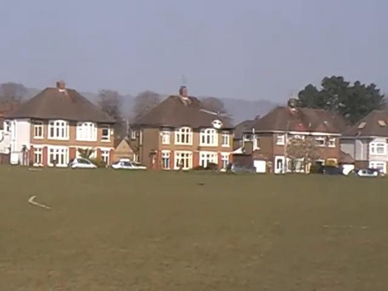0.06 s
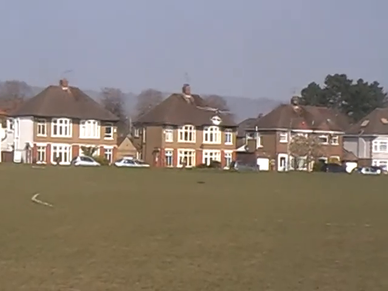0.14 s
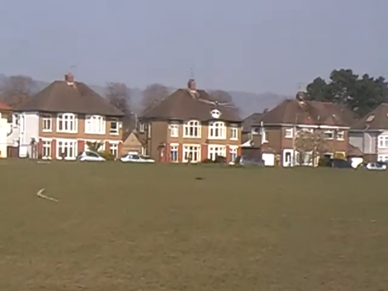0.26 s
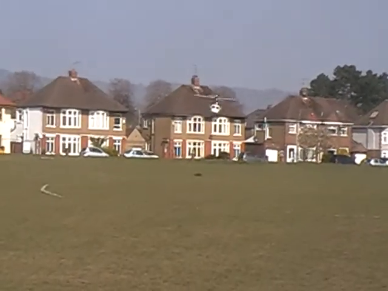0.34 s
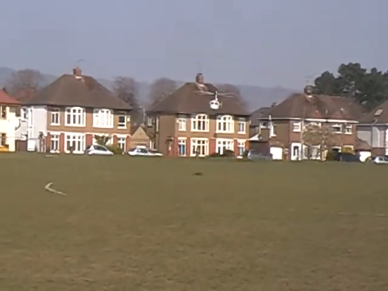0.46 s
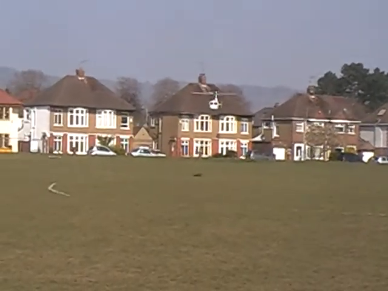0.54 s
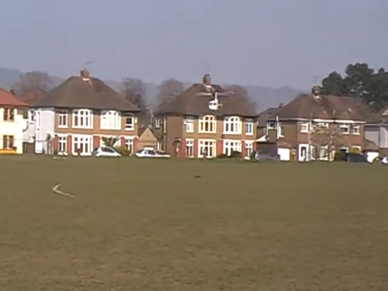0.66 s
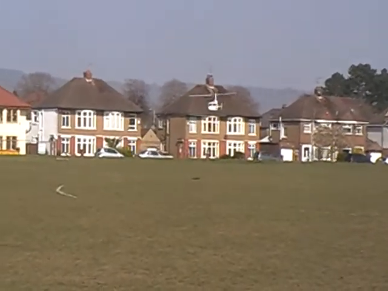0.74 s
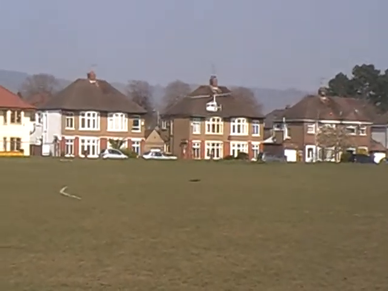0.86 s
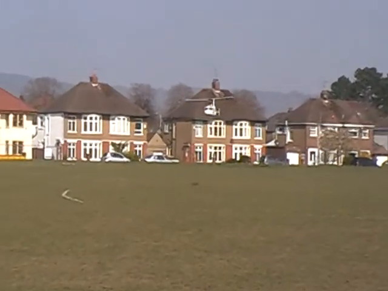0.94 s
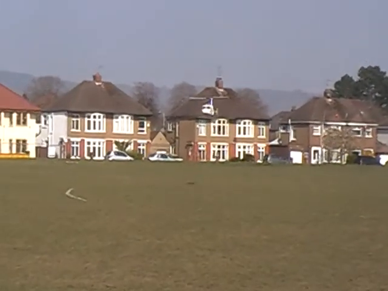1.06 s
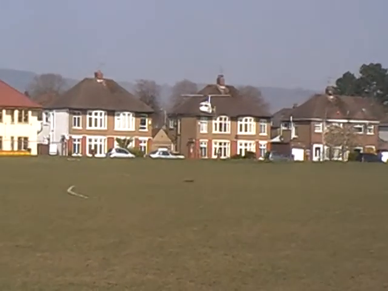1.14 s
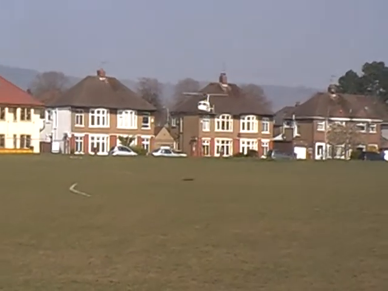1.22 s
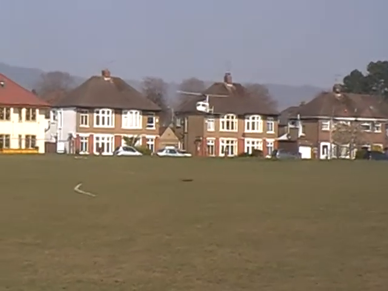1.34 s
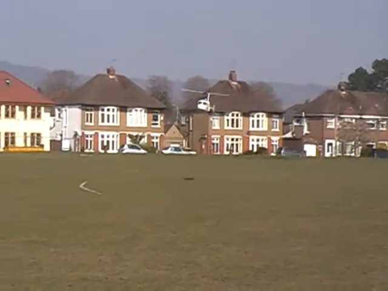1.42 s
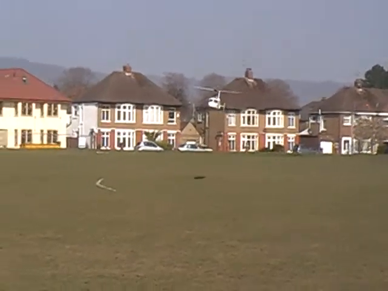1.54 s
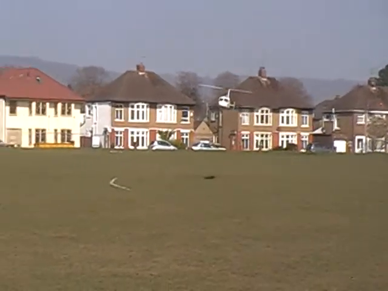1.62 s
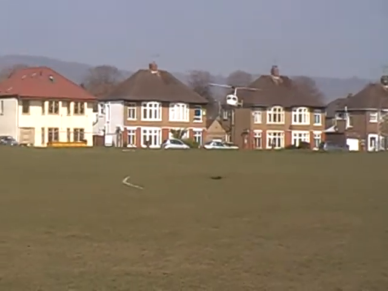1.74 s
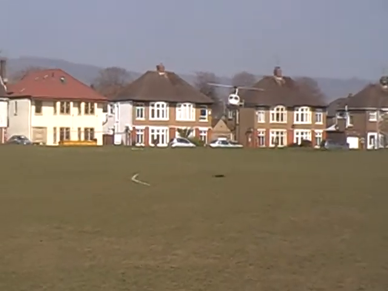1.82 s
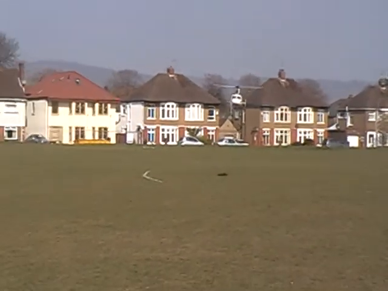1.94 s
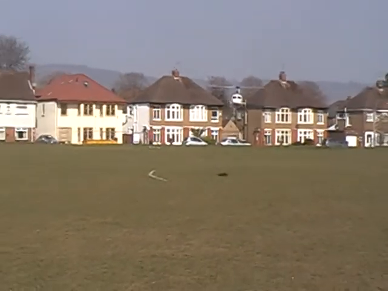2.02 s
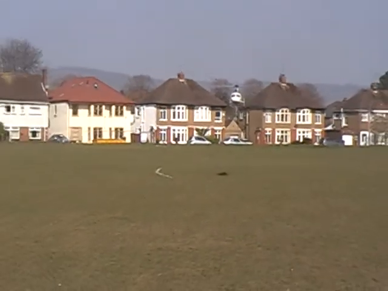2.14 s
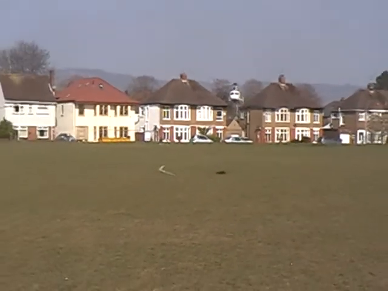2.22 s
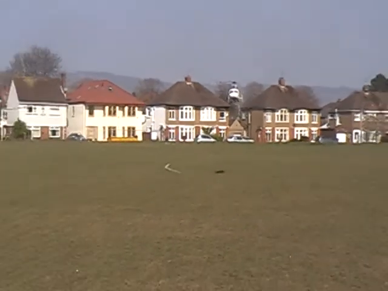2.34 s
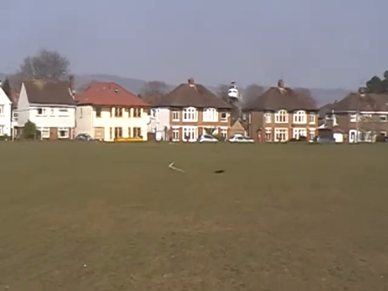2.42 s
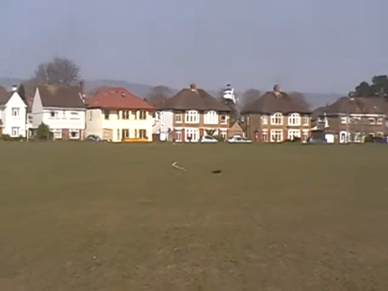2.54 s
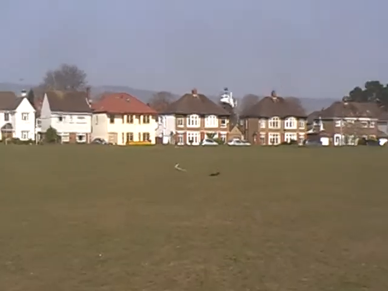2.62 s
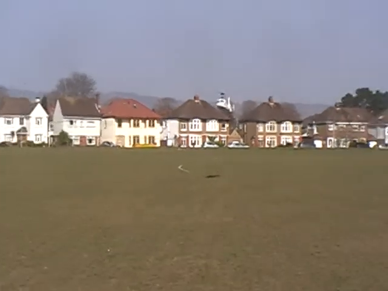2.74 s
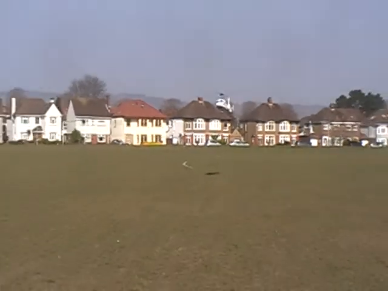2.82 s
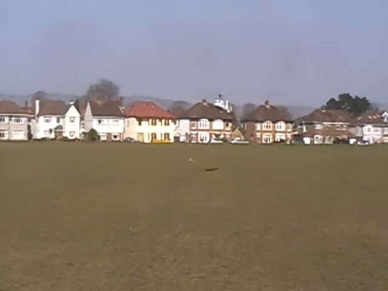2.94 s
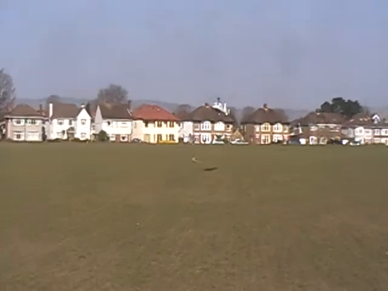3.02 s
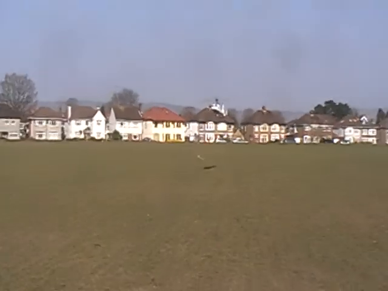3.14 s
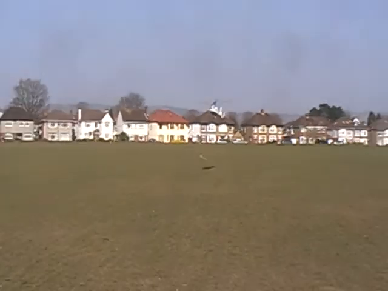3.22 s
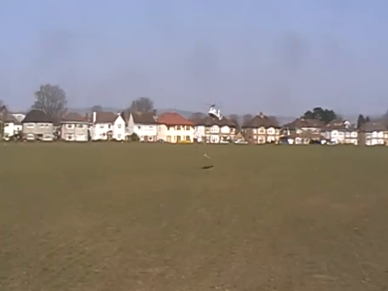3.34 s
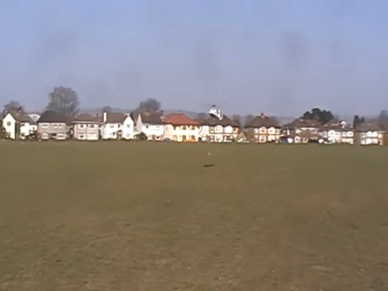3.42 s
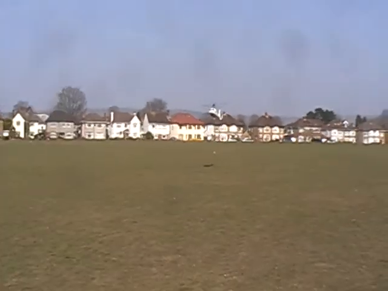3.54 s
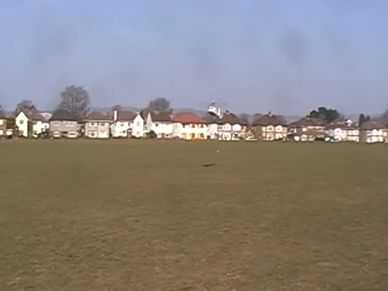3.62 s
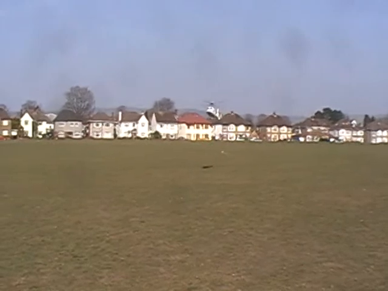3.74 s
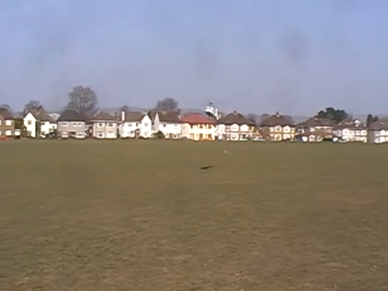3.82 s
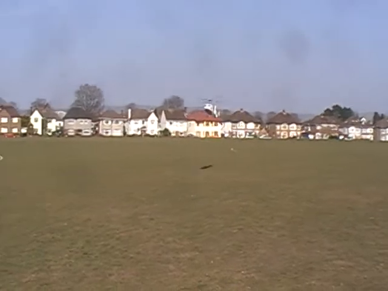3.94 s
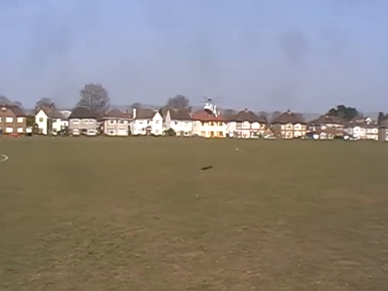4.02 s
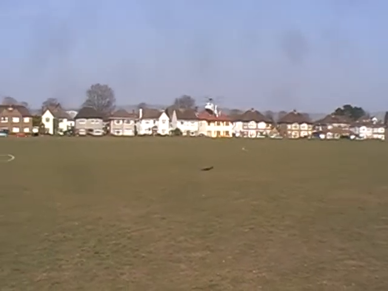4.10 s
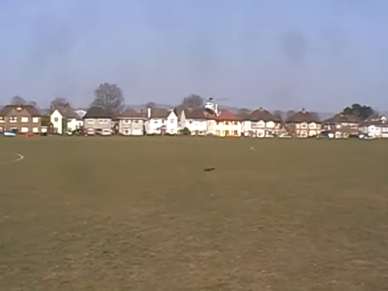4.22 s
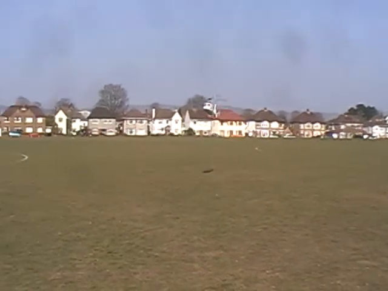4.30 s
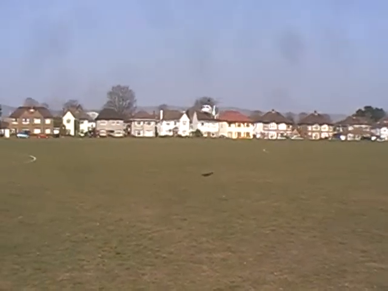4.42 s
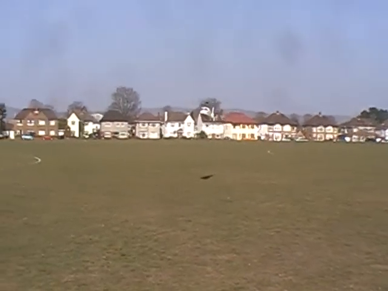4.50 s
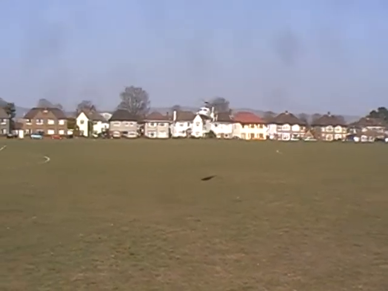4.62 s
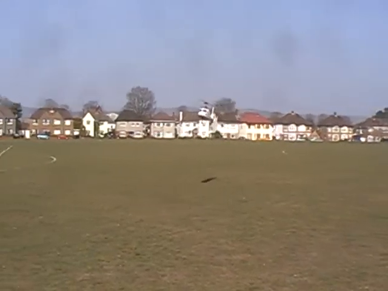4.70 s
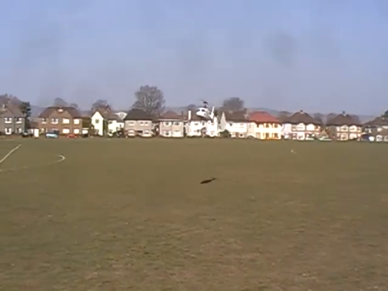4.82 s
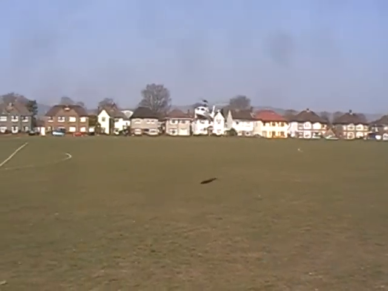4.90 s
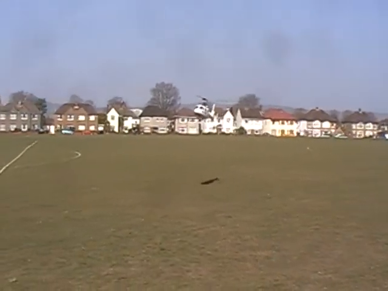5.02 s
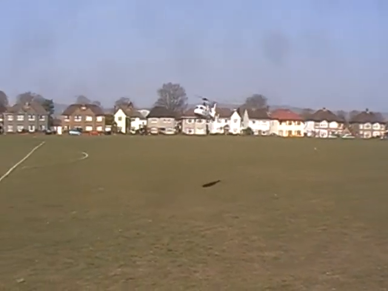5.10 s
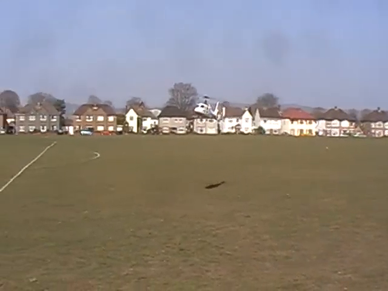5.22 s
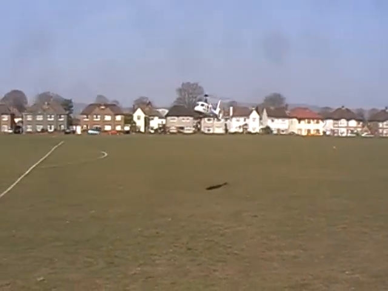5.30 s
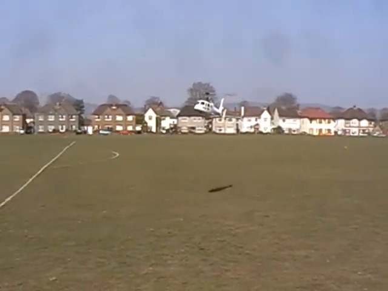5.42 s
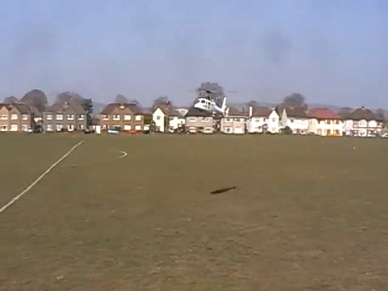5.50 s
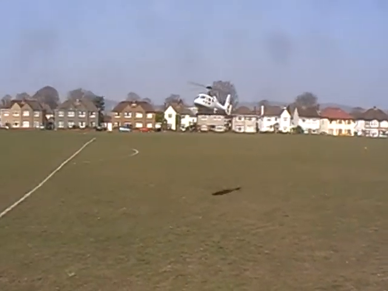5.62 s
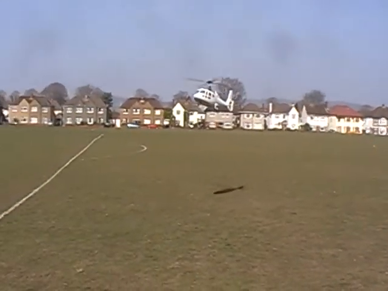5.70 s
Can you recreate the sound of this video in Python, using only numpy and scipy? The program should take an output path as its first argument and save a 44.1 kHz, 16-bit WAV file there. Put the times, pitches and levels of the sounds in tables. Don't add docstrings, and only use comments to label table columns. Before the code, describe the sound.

A petrol model helicopter flies over an open grass field, heard on a stereo camera microphone. From the start there is a raspy, buzzing drone near 160 Hz, rich in harmonics, with gear whines, rapid rotor flutter and hissing exhaust. It stays at moderate level while circling, with small wavers, brief ringing chirps around 0.5 to 2 seconds and dips near 1.05 and 1.85. A tiny knock clicks at about 0.5. From 2.2 the pitch sags, reaching its lowest near 3.7, around 143 Hz, as the tail turns this way; the low tone thins and the treble becomes hissy and crackly. A fuzzy high fan whine shows briefly at 3.3 and more strongly around 4.2. From 4 seconds pitch climbs and loudness swells steadily, the low tone pulsing slowly, loudest at the end, 5.76. Soft wind thumps touch the left side from 3.8 to 4.8, over very faint distant murmur.

```python
import sys
import numpy as np
from scipy import signal
from scipy.fft import rfft, irfft, next_fast_len
from scipy.io import wavfile
from scipy.ndimage import uniform_filter1d, map_coordinates

SR = 44100
rng = np.random.default_rng(int(sys.argv[2]) if len(sys.argv) > 2 else 0)


def volts_from_db(level):
    exponent = np.asarray(level, float) / 20
    return 10 ** exponent


def unload_audio(sound):
    columns = np.transpose(np.atleast_2d(sound))
    steps = np.round(np.clip(columns, -1, 1) * 32767)
    wavfile.write(sys.argv[1], SR, steps.astype(np.int16))


N = 254016
COARSE = np.arange(0, N + 64, 64)

# time_s, firing_hz, level_db
ENGINE = [(0, 162.8, -26), (.3, 162.7, -24), (.75, 162.3, -24), (1.05, 161.7, -24.5), (1.5, 161.7, -23.5),
          (1.9, 161.7, -25), (2.2, 160.5, -24.5), (2.45, 159.9, -25.5), (2.75, 154, -25), (3.2, 149.7, -24),
          (3.45, 146.5, -24), (3.7, 143.3, -23.5), (4.1, 145.1, -22), (4.5, 147, -20.5), (4.8, 149, -19),
          (5.05, 152.4, -17.5), (5.3, 153.4, -16.5), (5.76, 156, -15)]
# time_s, heading (0 side, 1 tail, 2 nose), grass_delay_ms, grass_strength (0-1), phase_turns
FLIGHT = [(0, 0, .36, .45, -.12), (.7, 0, .41, .47, -.1), (1.2, 0, .5, .48, -.13), (1.6, 0, .5, .54, -.08),
          (2.1, .15, .55, .82, -.09), (2.6, .65, .66, .8, -.075), (3.2, 1.04, .72, .87, .015),
          (3.6, 1.02, .78, .86, .075), (4, 1.12, .93, .62, .03), (4.5, 1.56, 1.07, .45, .03),
          (5.1, 1.83, 1.24, .54, -.01), (5.35, 1.85, 1.42, .4, 0), (5.5, 1.95, 1.6, .6, 0),
          (5.76, 2.04, 1.66, .5, 0)]


def helicopter():
    # frequency_hz, level_db
    grass_colour = [(200, -1), (600, -2), (1500, -4), (4000, -8), (9000, -18)]
    # frequency_hz, level_db
    hull_colour = [(1200, -30), (2500, -3), (9000, 0)]
    t = np.arange(N) / SR
    steady, rocked = shaft()
    heading, grass_ms, grass, turns = curves(FLIGHT)
    level = volts_from_db(curves(ENGINE)[1])

    tones = shaft_tones(steady, rocked, heading) + gear_tones(steady, heading)
    direct = level * (tones + chirps(steady, rocked) + volts_from_db(-3.0) * hiss(rocked, heading))

    off_grass = echo(direct, grass_colour, grass_ms, grass, turns)
    hull_ms = .015 + .105 * np.tanh(t / .45) + .012 * t
    hull_strength = .6 * np.exp(-(t / 1.5) ** 2)
    off_hull = echo(direct, hull_colour, hull_ms, hull_strength)

    strong = exhaust(rocked, heading, grass_ms, grass, turns)
    treble = level * (whistle(steady) + spits(steady, heading))
    return direct + off_grass + off_hull + strong + treble


def shaft():
    firing_hz = curves(ENGINE)[0]
    steady = 2 * np.pi * np.cumsum(firing_hz) / SR
    rocked = steady + 0.043 * np.sin(steady / 16) + 0.036 * wobble(25)
    return steady, rocked


def exhaust(rocked, heading, grass_ms, grass, turns):
    # order, side_db, tail_db, nose_db, lurch_share
    strong_orders = [(1, -20, -15.5, -27.5, 0.22), (2, -22.5, -13.5, -12, 0.96), (4, -14, -12.5, -14, 0.52),
                     (6, -18, -18.5, -13, 0.13)]
    # time_s, half_length_s, level_db
    lurches = [
        (0, .06, -14),
        (1.05, .1, -6),
        (1.84, .08, -8),
        (2.6, .08, -13),
    ]
    # time_s, half_length_s, level_db
    shadow = (3.7, 0.91, -13.5)
    shadow_s, shadow_half_s, shadow_peak_db = shadow
    lurch_db = sum(db * spell(s, half, sharp=2) for s, half, db in lurches)
    shadow_db = shadow_peak_db * spell(shadow_s, shadow_half_s)

    controls = np.array([*curves(ENGINE), heading, grass_ms, grass, turns, lurch_db, shadow_db])
    controls = controls[:, np.minimum(COARSE, N - 1)]
    hz, level_db, heading, grass_ms, grass, turns, lurch_db, shadow_db = controls

    beat_hz, beat_peak_s, beat_share = 2.25, 5.26, .8
    closing = np.clip(3 * (heading - 1.3), 0, 1)
    beat = 1 + beat_share * closing * np.exp(2j * np.pi * beat_hz * (COARSE / SR - beat_peak_s))

    out = 0
    for order, side, tail, nose, share in strong_orders:
        lag_turns = order * hz * grass_ms / 1000 + turns
        gain = np.abs(1 + np.clip(grass + .2, 0, .9) * np.exp(2j * np.pi * lag_turns))
        if order == 1:
            gain = gain * np.abs(beat) * volts_from_db(shadow_db)
        db = level_db + by_heading(heading, side, tail, nose) + share * lurch_db + 20 * np.log10(gain)
        out = out + tone(rocked, order, db, drift=0.089, flutter_db=0.0)
    return out


def shaft_tones(steady, rocked, heading):
    weak_orders = [.5, 1.5, 3, 5, 7, 8, 9, 10, 11, 12, 13, 14, 15, 16, 17, 18, 19, 21, 22, 23, 24, 25, 26,
                   33, 35, 37, 38, 41, 48, 49]
    # side_db, tail_db, nose_db
    weak_levels = [(-42, -38, -33.5), (-33.5, -34, -27), (-23, -21, -29), (-29.5, -19, -19.5),
                   (-30, -23, -25.5), (-23, -19.5, -31), (-19.5, -21.5, -15), (-30, -20, -24),
                   (-18.5, -14, -16), (-12, -16.5, -18), (-33, -22.5, -15), (-15.5, -17, -17),
                   (-41, -15, -20.5), (-25.5, -28, -36), (-18.5, -38, -21), (-24, -24, -27),
                   (-22, -25, -21.5), (-22, -30, -25), (-31, -35, -18), (-15, -30, -24), (-15.5, -32, -33),
                   (-34, -32, -18.5), (-45, -24, -30), (-17, -27, -21.5), (-31, -31, -22), (-27, -36, -32),
                   (-19, -53, -17), (-33, -37, -18), (-36, -49, -24), (-46, -52, -18)]
    turn = heading[np.minimum(COARSE, N - 1)]
    lines = sum(tone(rocked, order, by_heading(turn, *db), drift=.23, flutter_db=2.2)
                for order, db in zip(weak_orders, weak_levels))
    return lines * volts_from_db(0.64 * np.cos(steady / 16 + 1))


def gear_tones(steady, heading):
    gear_ratios = [.88, 1.75, 3.5, 4.38, 9.46, 10.12, 10.75, 11.38, 12.38, 13.25, 14.54, 22.74, 53.9, 75]
    # side_db, tail_db, nose_db
    gear_levels = [(-44, -32.5, -34), (-28.5, -25.5, -25), (-29, -51, -42), (-26, -33, -19.5),
                   (-43, -57, -8.5), (-18, -15, -15), (-42, -34, -13.5), (-22, -35, -9.5), (-28, -41, -31),
                   (-21.5, -32, -27), (-26, -16, -23.5), (-25.5, -25, -18), (-50, -50, -24),
                   (-47, -33, -38)]
    turn = heading[np.minimum(COARSE, N - 1)]
    return sum(tone(steady, ratio, by_heading(turn, *db), drift=.23, flutter_db=2.2)
               for ratio, db in zip(gear_ratios, gear_levels))


def chirps(steady, rocked):
    # time_s, half_length_s, level_db
    flare_spells = [
        (.75, .4, -14),
        (1.3, .2, -15),
        (1.72, .25, -13),
        (4.5, .45, -19),
    ]
    flare = np.exp(5.5 * (np.cos(steady / 16 - 4.4 + .4 * wobble(8)) - 1))
    size = sum(volts_from_db(db) * spell(s, half, sharp=3.8) for s, half, db in flare_spells)
    return size * unit(flare) * tone(rocked, 14, 0, drift=0.85, flutter_db=1.0)


def hiss(rocked, heading):
    # frequency_hz, level_db (per Hz)
    side_hiss = [(40, -43), (100, -16), (350, -15.5), (650, -2.5), (1150, -10), (1600, -5), (2200, -3),
                 (3100, -9.5), (3700, -9.5), (4400, -10.5), (5500, -6), (7200, -16.5), (10000, -20.5),
                 (15700, -54)]
    # frequency_hz, level_db (per Hz)
    tail_hiss = [(40, -71), (100, -9), (350, -10), (650, -1), (1150, -7), (1600, -2), (2200, -3),
                 (3100, -10.5), (3700, -8), (4400, -15), (5500, -5), (7200, -13.5), (10000, -22.5),
                 (15700, -45)]
    # frequency_hz, level_db (per Hz)
    nose_hiss = [(40, -40), (100, -16.5), (350, -15), (650, -2.5), (1150, -9), (1600, -6), (2200, -5),
                 (3100, -9), (3700, -9.5), (4400, -14), (5500, -6), (7200, -9), (10000, -16.5),
                 (15700, -39.5)]
    # side_db, tail_db, nose_db
    treble_tilt = (0, 2.9, -2.5)
    # time_s, half_length_s, level_db (at 10 kHz)
    veil = (0.39, 0.12, -8)
    veil_s, veil_half_s, veil_db = veil

    puffs_db = 0.88 * np.cos(rocked) + 0.4 * np.cos(2 * rocked)
    hz, t, z = signal.stft(rng.standard_normal(N) * volts_from_db(puffs_db), SR, nperseg=1024)
    turn = np.interp(t, np.arange(N) / SR, heading)
    views = (along(view, hz)[:, None] for view in (side_hiss, tail_hiss, nose_hiss))
    colour_db = by_heading(turn, *views)
    colour_db = colour_db - 10 * np.log10(np.mean(volts_from_db(2 * colour_db), axis=0))
    treble_db = by_heading(turn, *treble_tilt) + veil_db * np.exp(-((t - veil_s) / veil_half_s) ** 2)
    colour_db = colour_db + treble_db * hz[:, None] / 10000

    patches = uniform_filter1d(rng.standard_normal(z.shape), size=8, axis=0)
    patches = uniform_filter1d(patches, size=10, axis=1)
    return unit(signal.istft(z * volts_from_db(colour_db + 1.14 * unit(patches)), SR, nperseg=1024)[1][:N])


def spits(steady, heading):
    # side_db, tail_db, nose_db
    crackle_levels = (-41, -22.5, -31)
    # side_db, tail_db, nose_db
    swish_levels = (-36.5, -26, -28)
    starts = np.flatnonzero(np.diff(np.floor(steady / (4 * np.pi))))
    luck = rng.standard_normal((len(starts), 3))
    t = np.arange(360) / SR
    out = np.zeros(N + 2000)
    for start, (size, band, late) in zip(starts, luck):
        band_hz = np.clip(12400 + 1700 * band, 9000, 15300)
        grain = uniform_filter1d(rng.standard_normal(len(t)), size=14) * np.cos(2 * np.pi * band_hz * t)
        swing_db = 2.5 * size + 4 * np.cos(steady[start] / 7.9)
        begin = start + round(abs(late) * 40)
        out[begin:begin + len(t)] += volts_from_db(swing_db) * unit(grain) * np.hanning(len(t))
    swish = noise([(8000, -40), (11000, -12), (15700, 0)])[0]
    crackle = volts_from_db(by_heading(heading ** .6, *crackle_levels)) * unit(out[:N])
    return crackle + volts_from_db(by_heading(heading, *swish_levels)) * swish


def whistle(steady):
    # time_s, half_length_s, level_db
    whine_spells = [
        (3.33, .27, -18),
        (4.2, .47, -12),
        (5.1, .6, -24),
    ]
    narrow = unit(.3 + noise([(20, 0), (110, -3), (350, -30), (20000, -120)])[0])
    size = sum(volts_from_db(db) * spell(s, half) for s, half, db in whine_spells) * volts_from_db(1.2 * wobble(14))
    return size * np.sqrt(2) * narrow * np.sin(57.0 * steady)


def echo(x, colour, delay_ms, strength, turns=0):
    coloured = filtered(x, lambda hz: volts_from_db(along(colour, hz)))
    copy = np.real(signal.hilbert(coloured) * np.exp(-2j * np.pi * turns))
    late = map_coordinates(copy, [np.arange(N) - delay_ms * SR / 1000], mode="nearest")
    return np.clip(strength, 0, 1) * late


def wind():
    # time_s, level_db
    gust_hits = [(3.76, -40), (3.8, -35), (3.85, -33), (3.94, -32), (4.12, -33), (4.27, -29), (4.34, -30.5),
                 (4.41, -36), (4.62, -30), (4.68, -33.5), (4.81, -34)]
    t = np.arange(N) / SR
    gusts = sum(volts_from_db(db) * np.exp(-((t - s) / .016) ** 2) for s, db in gust_hits)
    rumble = noise([(30, -22), (80, 0), (200, -4), (400, -16), (2000, -70)], channels=2)
    return gusts * rumble * volts_from_db([[0], [-4]])


def knock():
    # time_s, level_db
    tap = (.4835, -24)
    tap_s, tap_db = tap
    t = np.arange(N) / SR
    decay = volts_from_db(tap_db - 60 * np.abs(t - tap_s) / .025) * (t > tap_s)
    return decay * noise([(500, -20), (2500, -3), (4500, 0), (8000, -8), (14000, -25)])


def field():
    # frequency_hz, level_db (per Hz)
    murmur = [(25, -22), (50, -1), (90, -13.5), (200, -5), (500, -7), (1500, 0), (4000, -60)]
    return volts_from_db(-52.0) * noise(murmur, channels=2) * volts_from_db([[1.5], [-1.5]])


def tone(phase, order, level_db, drift, flutter_db):
    wander = drift * (knots(6) + (order / 17) ** 2 * knots(40)) + rng.uniform(0, 2 * np.pi)
    size = np.sqrt(2) * volts_from_db(level_db + flutter_db * knots(5.013))
    wander, size = (np.interp(np.arange(N), COARSE, v) for v in (wander, size))
    return size * np.sin((order * phase + wander) % (2 * np.pi), dtype=np.float32)


def by_heading(heading, side, tail, nose):
    return side + (tail - side) * np.clip(heading, 0, 1) + (nose - tail) * np.clip(heading - 1, 0, 1)


def spell(s, half, sharp=4):
    return np.interp(np.arange(N), COARSE, np.exp(-np.abs((COARSE / SR - s) / half) ** sharp))


def knots(rate):
    return map_coordinates(rng.standard_normal(400), [COARSE * rate / SR])


def wobble(rate):
    return np.interp(np.arange(N), COARSE, knots(rate))


def curves(rows):
    s, *cols = np.transpose(rows)
    return [np.interp(np.arange(N) / SR, s, c) for c in cols]


def along(points, hz):
    f, v = np.transpose(points)
    return np.interp(np.log(hz + 1), np.log(f + 1), v)


def filtered(x, response):
    m = next_fast_len(N + 8192)
    return irfft(rfft(x, m) * response(np.fft.rfftfreq(m, 1 / SR)), m)[..., :N]


def noise(spectrum, channels=1):
    return unit(filtered(rng.standard_normal((channels, N)), lambda hz: volts_from_db(along(spectrum, hz))))


def unit(x):
    return x / np.sqrt(np.mean(x ** 2) + 1e-20)


def scene():
    # frequency_hz, left_minus_right_db
    lean_far = [(60, 2.0), (110, 1.5), (200, 1.5), (380, 0.0), (700, 0.0), (1290, -1.0), (2380, 0.0),
                (4400, 0.0), (8120, -0.5), (15000, -0.5)]
    # frequency_hz, left_minus_right_db
    lean_near = [(60, 4.5), (110, 3.0), (200, 2.5), (380, 1.5), (700, 0.0), (1290, -2.0), (2380, -0.5),
                 (4400, -0.5), (8120, -1.0), (15000, -1.5)]
    # frequency_hz, level_db
    scatter_colour = [(60, -7.5), (300, -18), (700, -25.5), (1500, -13.5), (2200, -23), (3000, -14.5),
                      (4400, -21.5), (5600, -17), (8000, -15.5), (15000, -4.5)]
    craft = helicopter()
    near = np.clip(curves(FLIGHT)[0] / 2, 0, 1)
    far_pair, near_pair = (filtered(craft, lambda hz: volts_from_db(along(lean, hz) * [[.5], [-.5]]))
                           for lean in (lean_far, lean_near))

    tail = rng.standard_normal(4000) * volts_from_db(-60 * np.arange(4000) / SR / 0.022)
    scattered = signal.fftconvolve(craft, tail / np.linalg.norm(tail))[:N]
    scattered = filtered(scattered, lambda hz: volts_from_db(along(scatter_colour, hz)))
    heard = (1 - near) * far_pair + near * near_pair + scattered * [[1], [-1]]
    return heard + wind() + knock() + field()


def band_limit(x):
    return signal.sosfilt(signal.butter(12, 16600, fs=SR, output="sos"), x)


def record(dry):
    top_hz = 15760
    limited = filtered(dry, lambda hz: hz < top_hz)
    return band_limit(limited)


dry = scene()
out = record(dry)
unload_audio(out)
```